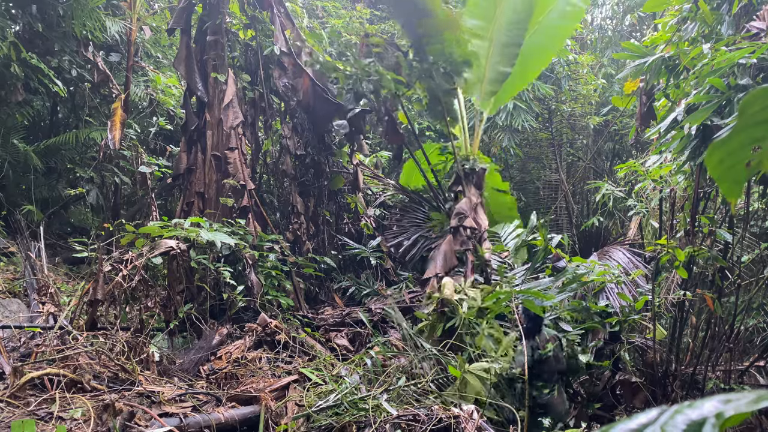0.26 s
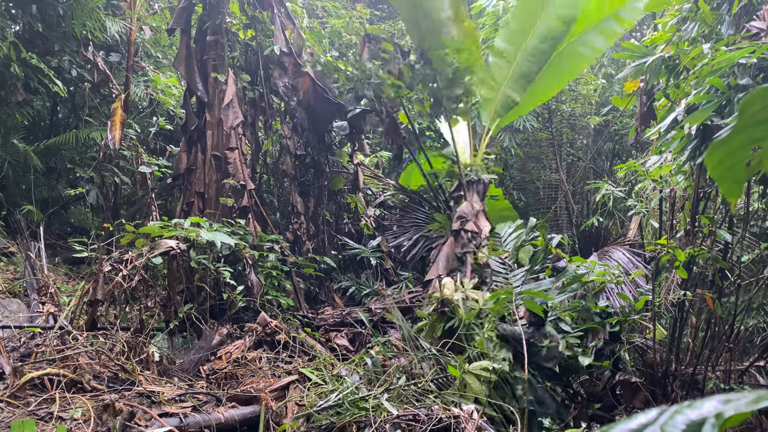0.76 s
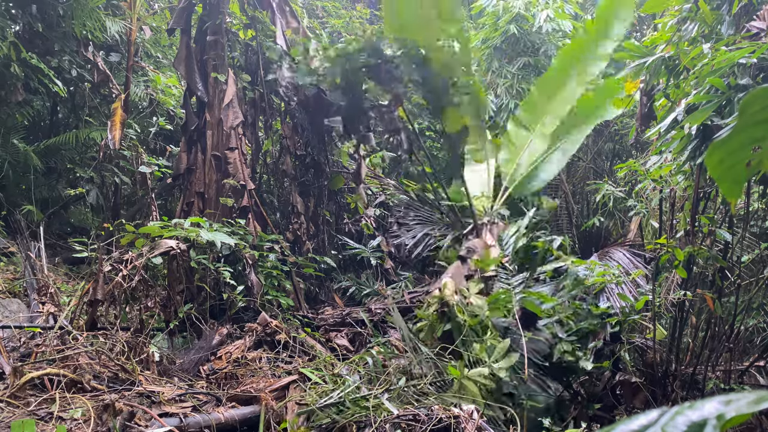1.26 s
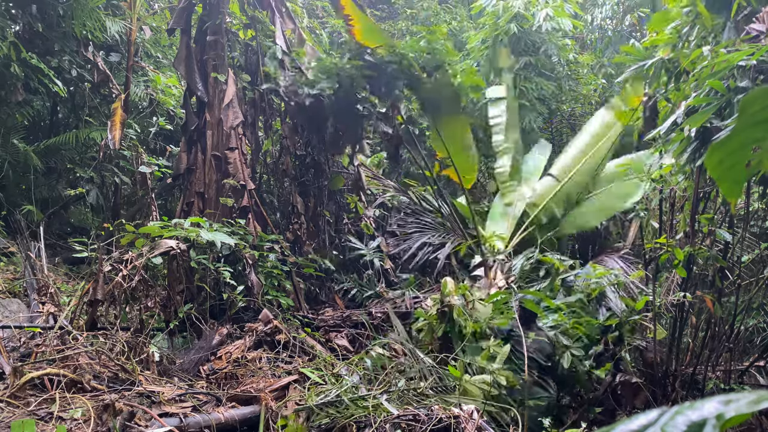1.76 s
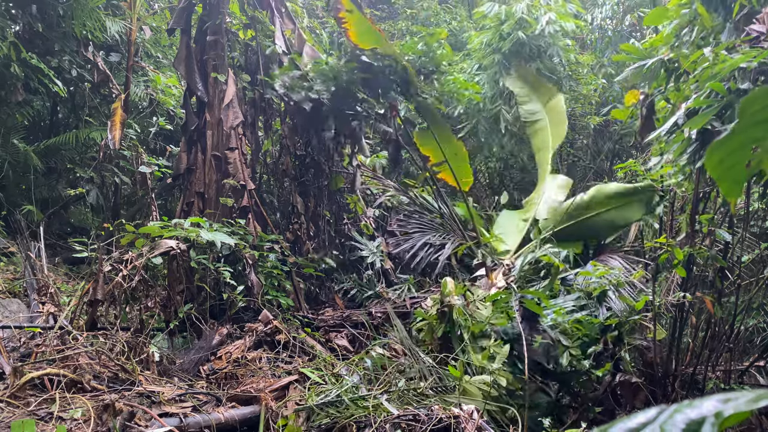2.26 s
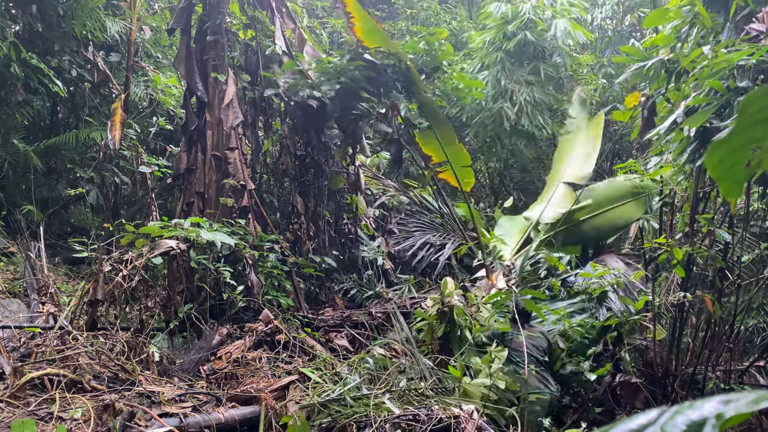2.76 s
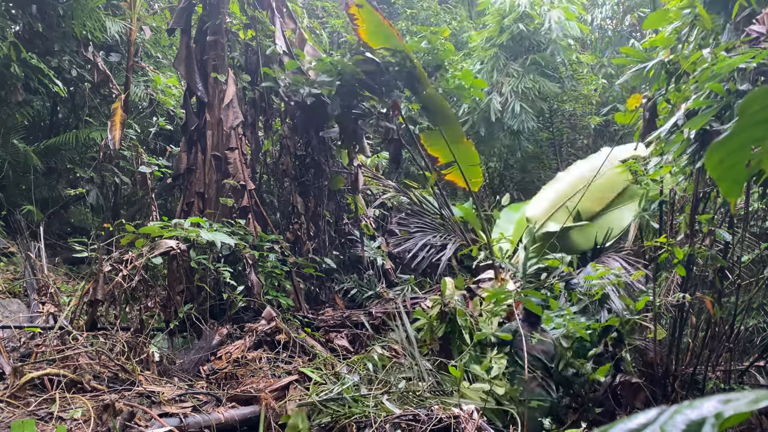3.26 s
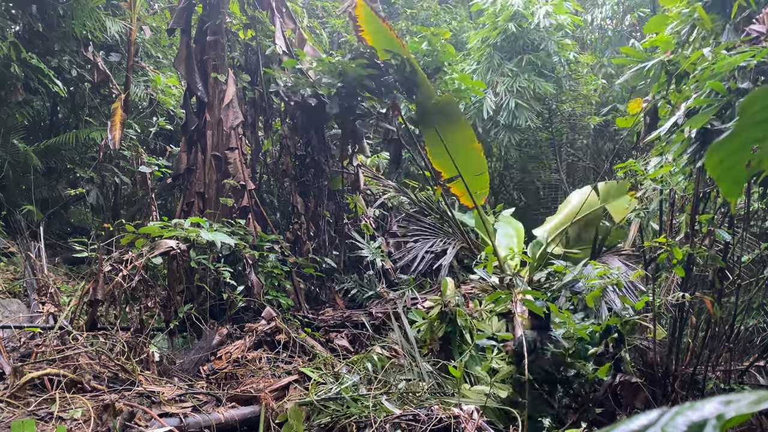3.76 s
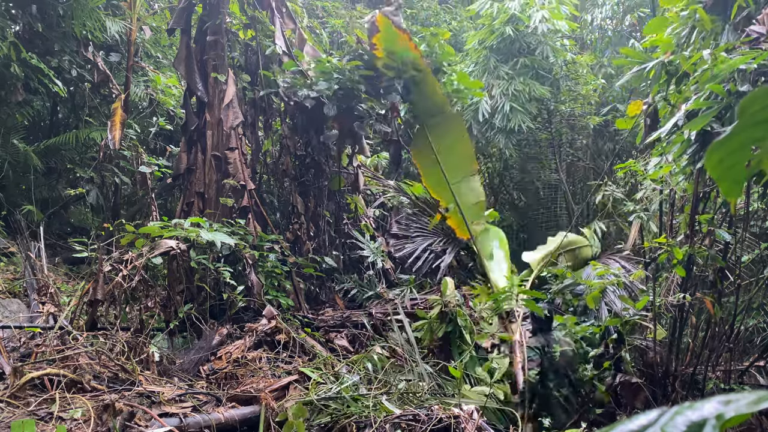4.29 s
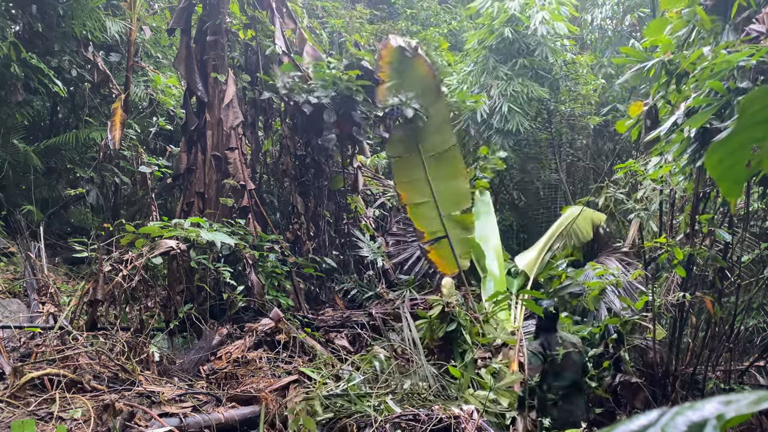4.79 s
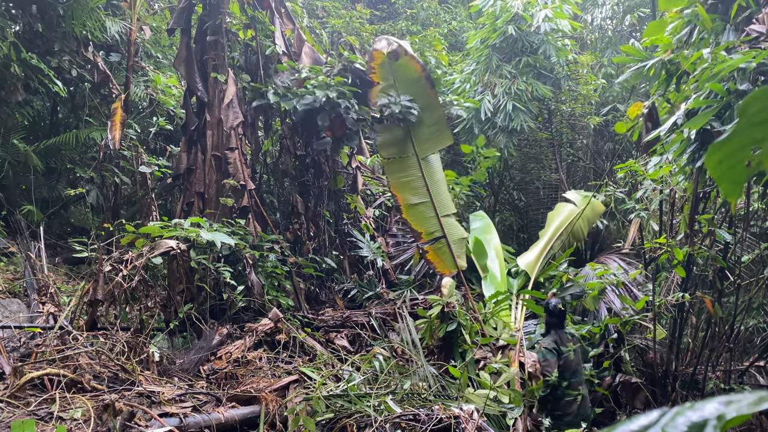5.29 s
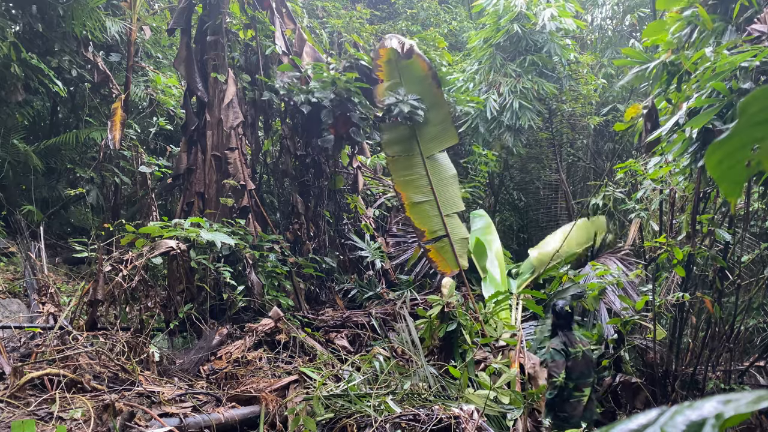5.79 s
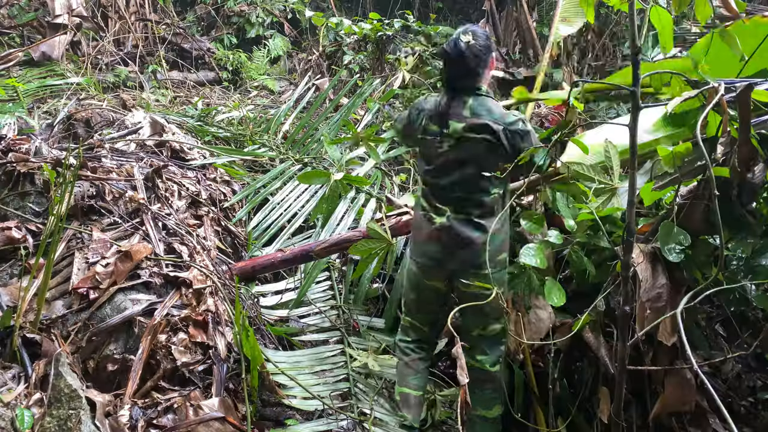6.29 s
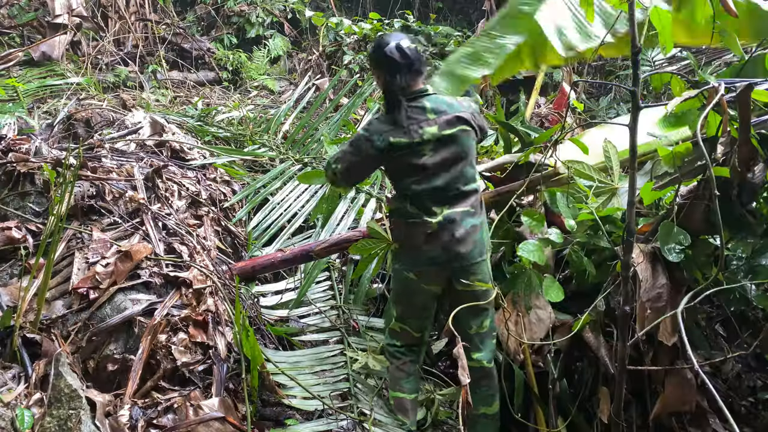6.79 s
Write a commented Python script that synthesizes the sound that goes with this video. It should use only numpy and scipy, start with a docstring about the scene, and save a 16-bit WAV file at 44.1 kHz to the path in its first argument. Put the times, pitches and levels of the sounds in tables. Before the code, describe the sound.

In a jungle, leaves rustle softly and twigs tick before a machete thuds into a wet, fibrous trunk. Big leaves sag through the brush with swishes, crackles and snaps, then calm. A brighter burst of snaps follows, later a second, crunchier chop. After a tiny silent gap, a nearer leaf rustles as it is pulled. Phone microphone in stereo, short sparse outdoor echoes.

```python
"""Leaves rustle and twigs snap in a jungle; a machete bites into the soft, modal trunk of a banana plant, whose
big leaves sag through the brush as shaped noise with crackles, swishes and tapping stalks. A phone's low cut
slides up now and then, and late on the blade cuts again. After a short silent gap the scene changes to a nearer
rustle of a leaf being pulled, with more snaps. Sparse echoes answer knocks and snaps."""
import sys
import numpy as np
from scipy import signal
from scipy.io import wavfile
from scipy.ndimage import uniform_filter1d

SR = 44100
rng = np.random.default_rng(int(sys.argv[2]) if len(sys.argv) > 2 else 0)


def put_to_file(sound):
    """Save the sound as 16-bit audio at rate SR, in the file named by the first command-line argument."""
    columns = np.atleast_2d(sound).T  # one column per channel
    safe = np.clip(columns, -1, 1)
    whole_steps = np.round(safe * 32767)
    wavfile.write(sys.argv[1], SR, whole_steps.astype(np.int16))


N = 310889

# jolts of the blade in two blows: start_s, knock_db, tilt_db_per_octave, crunch_db, crunch_t60_s
BLADE_JOLTS = [(0.7804, -18, 13.5, -27, 0.05), (0.7842, -13, 0, -25, 0.44), (0.7893, -20.5, -4, -23, 0.22),
               (5.49, -41, 19, -21.5, 0.053), (5.4945, -29, 6, -17, 0.13), (5.5036, -16, 12.5, -25.5, 0.33),
               (5.52, -29, -4, -33, 0.38)]
# modes of the wet trunk before the tilt of each jolt: pitch_hz, level_db, t60_s
TRUNK_MODES = [(88, -17.5, 0.12), (188.4, -10, .09), (225, -6, 0.08), (402, -1.5, 0.056), (460, 3, 0.065),
               (590, 7, 0.028), (853, -4, 0.065), (1090, 1.5, 0.026), (1300, -8.5, .02), (1480, 1, 0.017),
               (1873, -10.5, 0.027), (2240, -3, 0.011), (4200, -17.5, 0.0024)]


def chop(knock_db, tilt_db, crunch_db, crunch_t60_s):
    """The blade's push rings the trunk modes; fibres tearing in grains shake them and hiss."""
    t = np.arange(12000) / SR
    push_s = 0.00046
    push = np.sin(np.pi * np.clip(t / push_s, 0, 1)) ** 2
    grains = amp(4 * rng.standard_normal(len(t) // 40)).repeat(40)
    envelope = np.minimum(t / 0.001, 1) * amp(-60 * t / crunch_t60_s)
    tear = rng.standard_normal((2, len(t))) * grains * envelope
    struck = [(hz, db + tilt_db * np.log2(hz / 500), t60) for hz, db, t60 in TRUNK_MODES]
    # under the tearing the trunk is brighter and its modes die four times sooner
    damped = [(hz, db + 3.06 * np.log2(hz / 500), 0.25 * t60) for hz, db, t60 in struck]
    knock = peaked(modes(push, struck)) * [[1], [0.8]]  # left, right
    crunch = peaked(modes(tear, damped)) + amp(-0.5) * bright_tear(tear)
    return amp(knock_db) * knock + amp(crunch_db) * crunch


# twigs and leaf ribs: start_s, level_db, pitch_hz, crack_db (bright crack over the body)
TWIG_SNAPS = [(0.196, -33, 920, -15), (0.337, -40.5, 910, 6), (0.499, -42.5, 920, -4),
              (0.609, -36, 610, -6), (0.636, -43, 1500, -3), (0.705, -41, 1940, -7), (1.064, -28, 700, -1),
              (1.143, -21.5, 1560, -6), (1.319, -24, 740, -13), (1.406, -32, 1360, -13),
              (1.444, -30, 1380, -5), (1.495, -26, 2090, -16), (1.894, -30.5, 2220, -5),
              (2.084, -35.5, 1750, -17), (2.119, -33.5, 587, -15), (2.362, -36, 2160, -12),
              (2.978, -33.5, 2120, -23), (3.385, -34, 2290, -18), (3.423, -34, 1590, -8),
              (4.285, -23.5, 2520, 1.5), (4.338, -23.5, 1290, -4), (4.413, -37, 1172, 12.5),
              (4.486, -30, 1267, -10), (4.79, -40.5, 1180, 6), (5.076, -52.5, 2750, 0),
              (5.171, -44, 760, -6.5), (6.07, -42, 1690, -17), (6.097, -36.5, 1760, -16),
              (6.321, -34, 990, -7), (6.825, -33.5, 484, -18), (6.895, -42, 1790, -22),
              (6.929, -38.5, 1900, -18), (6.963, -34, 2360, -26)]


def snap(level_db, pitch_hz, crack_db, tear_t60_s=0.052):
    """A break and a short burst of tearing ring the broken piece; the bare burst is the bright crack."""
    t = np.arange(3000) / SR
    tear = rng.standard_normal((2, len(t))) * amp(-60 * t / tear_t60_s)
    tear[:, :80] *= 0.3  # fibres give way just before the break
    tear[:, 80:82] = [8.0, -6.0]  # the break itself
    body = ring(tear, pitch_hz, 8 / pitch_hz)
    body = body + 0.7 * ring(tear, 1.9 * pitch_hz, 5 / pitch_hz)
    return amp(level_db - 3.5) * (peaked(body) + amp(crack_db) * bright_tear(tear))


# colour of bare tearing: pitch_hz, level_db, t60_s
TEAR_MODES = [(4700, -6.5, 0.0012), (9950, -13, 0.0022)]


def bright_tear(tear):
    """Tearing fibres heard bare, coloured by short high modes, at a peak of one."""
    return peaked(modes(tear, TEAR_MODES))


# the sagging crown: start_s, hiss_db (leaves), scrape_db (fronds, over hiss), rumble_db (trunk, over hiss)
CROWN_SAG = [(0, -55.5, -1.5, -5), (0.28, -61.5, 0.5, 0.5), (0.5, -57, -4.5, -6), (0.76, -58, -0.5, -4),
             (0.82, -46, -1.5, 1), (1.45, -45, -3, -7), (1.8, -52.5, -2.5, -3), (2.3, -55.5, -2.5, -4),
             (2.62, -51, -5.5, -13), (2.82, -56.5, -3, -13), (3.37, -58.5, 1.5, -1), (3.395, -53, 0, -6),
             (4.24, -48, 2.5, -13.5), (4.5, -47, -3, -8), (4.95, -64, 1, -11), (5.15, -63, -10.5, 1.5),
             (5.7, -56.5, -2, -8.5), (6.2, -66.5, 5, -11), (6.274, -59.5, 3.5, 3), (6.46, -60, 7.5, -2),
             (6.66, -53, 5, -2.5), (6.92, -67.5, 6, 7), (7.04, -63.5, 8, -24)]
# single leaves sweeping past a branch: start_s, length_s, hiss_db, scrape_db (over hiss),
# rumble_db (over hiss)
LEAF_SWISHES = [(0.178, 0.067, -45.5, -13, -26), (0.232, 0.045, -60, 7, 6), (0.605, .16, -49.5, -3, -8),
                (1.054, 0.083, -44, -10, -12), (1.224, .06, -41, -3, -21), (1.304, 0.06, -51, 10.5, -16),
                (1.83, 0.24, -53, -13, -4), (1.94, 0.079, -54, 3.5, -3), (2.103, 0.16, -50.5, -2, -2.5),
                (2.351, .09, -55.5, 4, 5.5), (2.965, 0.14, -59.5, 1.5, -4), (3.37, 0.31, -50.5, -18, -24),
                (3.63, 0.15, -48.5, -16, -11.5), (4.268, 0.17, -38.5, -10.5, -32),
                (4.778, 0.068, -53.5, -1, -28), (4.86, 0.058, -55, -5, -6), (5.064, .04, -53.5, -13, -1),
                (5.167, 0.35, -53.5, -6.5, -13.5), (5.492, 0.16, -43.5, -13, -8.5),
                (6.92, .03, -53, -10, -14), (6.962, 0.083, -52.5, -1.5, -21)]


def stirring(column, rise_s=0.022, fade_db=15.5):
    """Level in dB of hiss (0), scrape (1) or rumble (2): the slow sag plus each swish, added in power."""
    now = np.arange(N) / SR
    sag_db = curve(CROWN_SAG)
    if column > 0:
        sag_db = sag_db + curve(CROWN_SAG, column=column + 1)
    power = amp(2 * sag_db)
    for start_s, length_s, hiss_db, *over_db in LEAF_SWISHES:
        first = round(start_s * SR)
        age = now[first:][:round(3 * length_s * SR)] - start_s
        swish_db = hiss_db + [0, *over_db][column] - fade_db * (age / length_s) ** 2
        swish = np.clip(age / rise_s, 0, 1) * amp(swish_db)
        power[first:][:len(age)] += swish ** 2
    return 10 * np.log10(power)


# leaf colour before and after the gap, each only relative: pitch_hz, level_db (per Hz)
FAR_LEAVES = [(18, -42), (30, -22.5), (86, -14), (280, -12), (336, -17), (554, 0.5), (740, -6), (937, 2),
              (1100, 0), (1540, 0.5), (8300, -6), (9970, -2), (12000, -8.5), (14800, -13.5), (16000, -39)]
NEAR_LEAVES = [(18, -65), (30, -47), (66, -21), (127, -25.5), (303, -5), (384, -19), (889, -8.5),
               (988, -17), (1160, -10.5), (2350, -19), (9970, -13.5), (14400, -23.5), (16000, -38)]


def rustle(patchy_db=1.26, crackle_db=-4, crackles_per_s=900, split_hz=(350, 3500)):
    """Dense leaf friction with small crackles in it, shared out to rumble, scrape and hiss."""
    sizes = amp(3.5 * np.minimum(rng.exponential(1, N), 3.5))
    starts = sizes * (rng.random(N) < crackles_per_s / SR)
    decay = np.exp(-np.arange(400) / (0.0019 * SR))
    crackle = evened(signal.oaconvolve(starts, decay)[:N])
    drive = rng.standard_normal((2, N)) * np.sqrt(1 + amp(2 * crackle_db) * crackle ** 2)

    hz, t, z = signal.stft(drive, SR, nperseg=1024, noverlap=768)
    patches = uniform_filter1d(rng.standard_normal(z.shape[1:]), 12, 0)  # across pitch
    patches = uniform_filter1d(patches, 10, 1)  # across time
    z = z * amp(by_view(FAR_LEAVES, NEAR_LEAVES, t, hz) + patchy_db * evened(patches))

    low, high = [1 / (1 + (edge / (hz + 1)) ** 6) for edge in split_hz]  # shares above each split
    shares = (1 - low, low - high, high)  # rumble, scrape, hiss
    near, out = np.arange(N) / SR > GAP[0], 0
    for share, column in zip(shares, (2, 1, 0)):
        banded = z * np.sqrt(abs(share))[:, None]
        layer = signal.istft(banded, SR, nperseg=1024, noverlap=768)[1][:, :N]
        layer = np.where(near, layer / layer[:, near].std(), layer / layer[:, ~near].std())
        out = out + amp(stirring(column)) * layer
    return out


def knocks(per_s=14, level_db=-9, cycles=25):
    """Stalks of many sizes tap one another, following the level of the scraping fronds."""
    out = np.zeros((2, N))
    for hz in np.geomspace(450, 2600, num=12):
        taps = amp(5 * rng.standard_normal(N)) * (rng.random(N) < per_s / SR)
        side_gains = amp(3 * rng.standard_normal((2, 1)))
        out += ring(taps, hz, cycles / hz) * side_gains
    return evened(out) * amp(level_db + stirring(column=1))


# echoes off trunks and brush: pitch_hz, t60_s
BRUSH_ECHOES = [(100, 0.17), (500, 0.34), (2000, 0.1), (8000, .25)]


def brush(x):
    """Sparse echoes of random sign, each band dying at its own speed."""
    taps = np.zeros((2, SR // 2))
    slots = np.arange(120, SR // 2 - 20, 20)
    at = slots + rng.integers(0, 20, (2, (SR // 2 - 121) // 20))
    np.put_along_axis(taps, at, rng.choice([-1.0, 1.0], at.shape), 1)
    hz, t, z = signal.stft(taps, SR, nperseg=256)
    fade = amp(-60 * t / read(BRUSH_ECHOES, hz)[:, None])
    tail = signal.istft(z * fade, SR, nperseg=256)[1]
    return signal.fftconvolve(x, tail / np.linalg.norm(tail[0]), axes=1)[:, :N]


def amp(db):
    """Gain of a level in dB."""
    return 10 ** (np.asarray(db) / 20)


def evened(x):
    """Sound scaled to an rms of one."""
    return x / np.sqrt(np.mean(x ** 2) + 1e-20)


def peaked(x):
    """Sound scaled to a peak of one."""
    return x / abs(x).max()


def ring(x, hz, t60):
    """One damped mode excited by x."""
    r = np.exp(-np.log(1000) / (t60 * SR))
    turn = 2 * np.pi * hz / SR
    return signal.lfilter([np.sin(turn)], [1, -2 * r * np.cos(turn), r * r], x)


def modes(x, table):
    """A body's modes; neighbours swing in opposite sign, so no holes open between them."""
    return sum((-1) ** k * amp(db) * ring(x, hz, t60) for k, (hz, db, t60) in enumerate(table))


def read(points, hz):
    """A spectrum table read on a log-frequency axis."""
    f, value = np.transpose(points)
    return np.interp(np.log(hz + 1), np.log(f + 1), value)


def curve(rows, column=1):
    """One column of a time table, sample by sample."""
    return np.interp(np.arange(N) / SR, *np.transpose(rows)[[0, column]])


def add(mix, start_s, sound):
    """Mixes a sound in at its start."""
    part = mix[:, round(start_s * SR):][:, :sound.shape[1]]
    part += sound[:, :part.shape[1]]


# silence between the far and the near view: start_s, end_s
GAP = (6.233, 6.262)


def by_view(far, near, t, hz):
    """A spectrum for each moment: the far view up to the gap, the near view from its start."""
    return np.where(t > GAP[0], read(near, hz)[:, None], read(far, hz)[:, None])


# the low cut climbs towards a goal, then lets go: start_s, end_s, goal_hz, depth_db (below 1100 Hz),
# sink_s (time constant of sinking back)
CUT_SLIDES = [(3.687, 4.133, 420, 26, 0.96), (4.0, 4.475, 125, 27, 0.091), (4.593, 4.9, 550, 19, 0.079),
              (4.815, 5.483, 3730, 19.5, 0.18), (5.821, 6.248, 537, 10.5, 0.037),
              (6.12, 6.249, 4000, 16, 0.021)]


def low_cut(t, hz, climb_s=0.19, notch_hz=150, notch_db=15, release_s=0.023, release_hz=1220):
    """Loss in dB over frequency and time of an edge that slides up and sinks; the deepest slide rules."""
    treble_loss_db = 18.0 * np.clip((hz - 1100) / 400, 0, 1)  # more is lost above 1100 Hz while the cut holds
    # the bass is let go last: release_s later at 0 Hz, at once from release_hz up
    release_lag = release_s * np.clip(1 - hz / release_hz, 0, 1)
    loss_db = 0
    for start_s, end_s, goal_hz, depth_db, sink_s in CUT_SLIDES:
        climb = 1 - np.exp(-np.clip(t - start_s, 0, end_s - start_s) / climb_s)
        sink = np.exp(-np.maximum(t - end_s, 0) / sink_s)
        edge = goal_hz * climb * sink
        under = np.clip((edge - hz) / 15.0, 0, 1)
        # as the edge sinks, only a strip below it stays dark
        strip = np.clip((hz - edge + notch_hz) / 38.0, 0, 1)
        cut_db = np.where(t < end_s + release_lag, depth_db + treble_loss_db, notch_db * strip)
        loss_db = np.maximum(loss_db, under * cut_db)
    return loss_db


def scene():
    """Two sound fields of the same scene, alike only in the knocks and breaks, to be blended at the microphone
    ports."""
    hits = np.zeros((2, N))
    for start_s, *settings in TWIG_SNAPS:
        add(hits, start_s, snap(*settings))
    for start_s, *settings in BLADE_JOLTS:
        add(hits, start_s, chop(*settings))
    bass_cut = signal.butter(4, 65, "high", fs=SR, output="sos")  # the hits carry no deep bass
    hits = signal.sosfilt(bass_cut, hits)
    return hits + amp(-11.5) * brush(hits) + rustle() + knocks()


# stereo balance, far and near: pitch_hz, left_over_right_db
FAR_PAN = [(60, -0.5), (380, -1), (2380, 0.5), (15000, 0.79)]
NEAR_PAN = [(60, 2), (950, -3.5), (15000, 2)]
# left-right likeness, far and near: pitch_hz, likeness (0 unrelated to 1 alike)
FAR_SAME = [(150, 0.97), (500, 0.55), (2000, 0.49), (4500, 0.13), (8000, 0.24), (15000, 0.8)]
NEAR_SAME = [(180, 1), (550, 0.39), (2000, 0.057), (15000, 0.4)]
# phase by which the left port leads, far and near: pitch_hz, lead_rad
FAR_LEAD = [(0, 0), (4310, 0.2), (5430, -1.5), (7750, 3.8), (9220, 1.3), (13400, -5.6), (14400, -6.4),
            (15200, -9.2), (16000, -9.5)]
NEAR_LEAD = [(0, 0), (690, -0.9), (1460, -7.6), (4130, -11.5), (7490, -2.4), (9220, -4.9), (16000, -16.1)]


def record(dry):
    """Two close ports, the sliding low cut, the silent gap and the band limit."""
    hz, t, (a, b) = signal.stft(dry, SR, nperseg=1024, noverlap=896)
    same = np.clip(by_view(FAR_SAME, NEAR_SAME, t, hz), 0, 1)
    pan = amp(by_view(FAR_PAN, NEAR_PAN, t, hz) / 2)
    lag = np.exp(-1j * by_view(FAR_LEAD, NEAR_LEAD, t, hz))
    right = (same * a + np.sqrt(1 - same ** 2) * b) * lag
    ports = np.array([a * pan, right / pan]) * amp(-low_cut(t, hz[:, None]))
    wet = signal.istft(ports, SR, nperseg=1024, noverlap=896)[1][:, :N]

    start_s, end_s = GAP
    gate_s = [start_s - 0.001, start_s, start_s + 0.011, end_s - 0.006, end_s, end_s + 0.0037]
    gate = np.interp(np.arange(N) / SR, gate_s, amp([1.5, -25, -34.5, -60, -27, 3]))
    lowpass = signal.firwin(511, 15500, window=("kaiser", 9), fs=SR)  # edge in Hz
    return signal.oaconvolve(wet * gate, lowpass[None], "same")


dry = scene()
out = record(dry)
put_to_file(out)
```